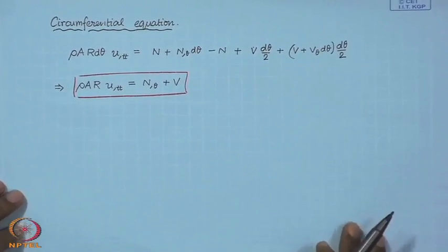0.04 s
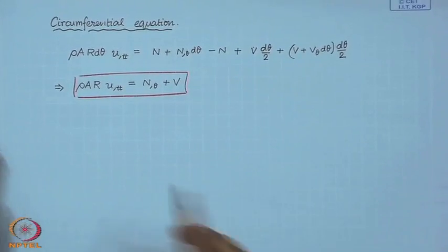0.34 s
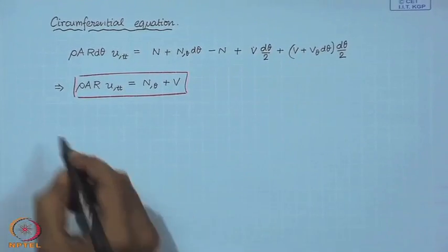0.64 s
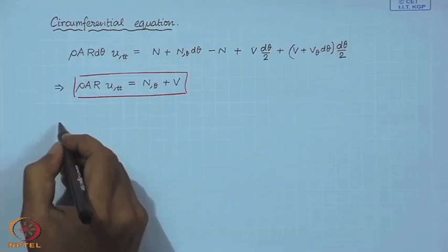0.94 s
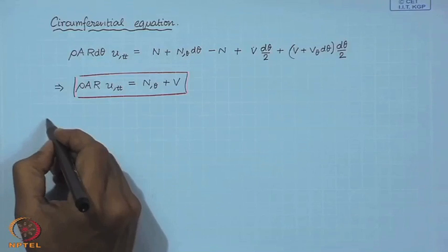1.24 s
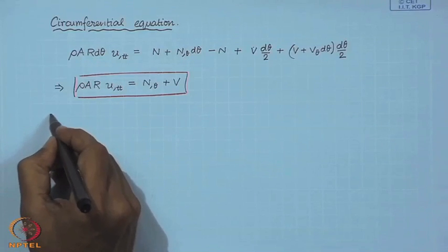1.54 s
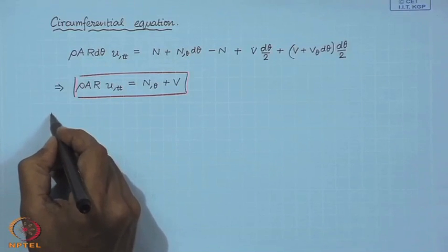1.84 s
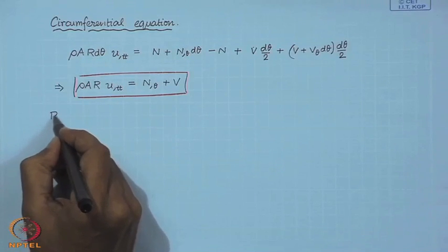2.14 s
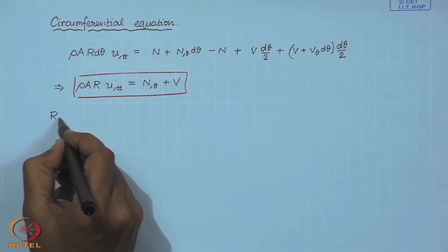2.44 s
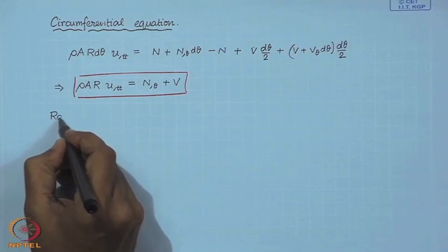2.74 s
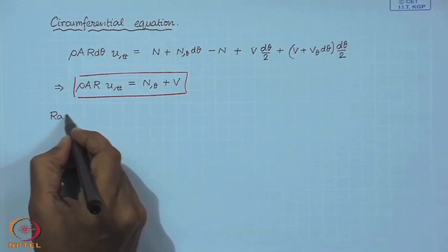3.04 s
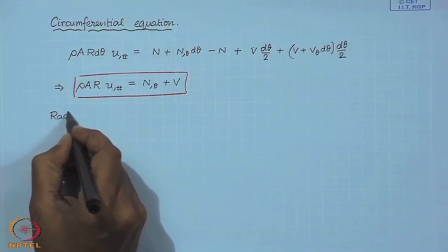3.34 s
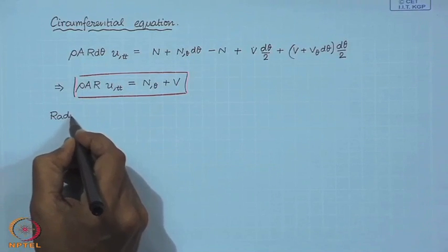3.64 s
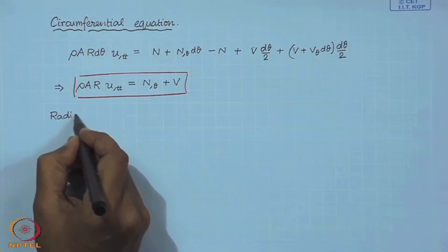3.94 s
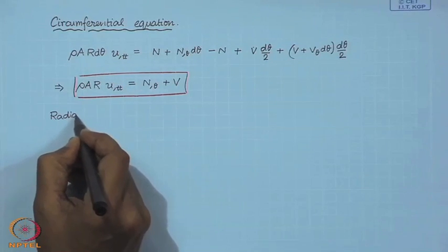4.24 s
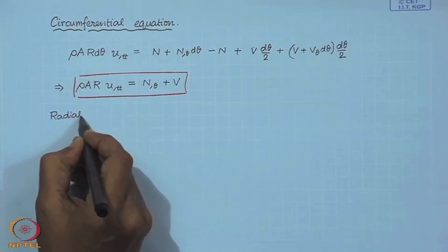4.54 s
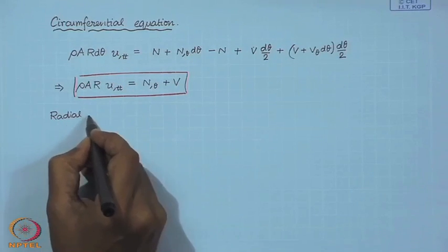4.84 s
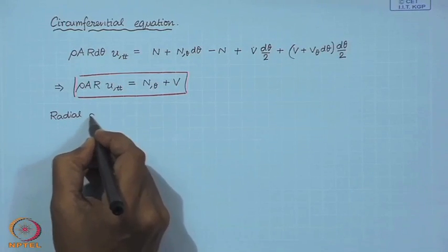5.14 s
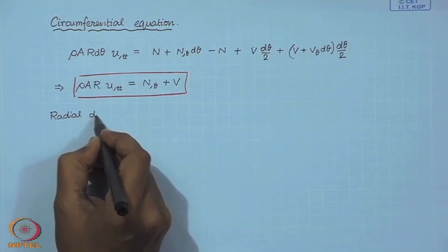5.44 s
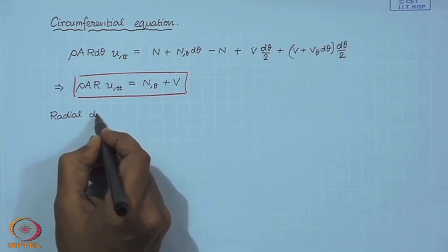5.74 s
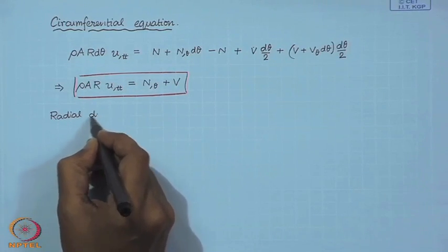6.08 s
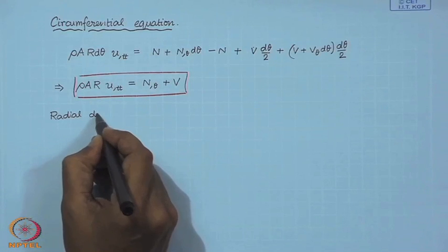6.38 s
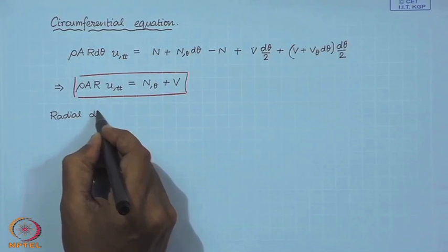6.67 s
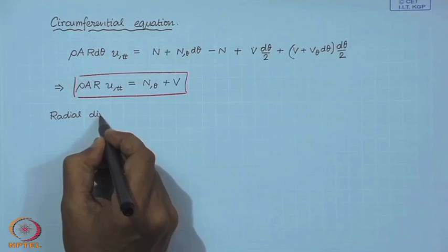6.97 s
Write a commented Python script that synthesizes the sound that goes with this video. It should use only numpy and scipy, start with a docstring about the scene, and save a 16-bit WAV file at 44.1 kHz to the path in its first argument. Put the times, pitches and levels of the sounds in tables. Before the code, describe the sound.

Paper rustles softly under a sliding hand, and a click and a small desk thump follow. A pen then scratches lightly on the sheet in brief clusters of strokes, growing sparser toward the end, among tiny taps and brushes of skin. The writing is faint against the steady low rumble of ventilation in a lecture room, heard through a single microphone.

```python
"""A hand slides across a sheet of paper, over the low rumble of ventilation in a quiet lecture room.
Then a pen writes a few letters: its tip catches and slips on the fibres, and this stick-slip friction
excites the resonances of pen and sheet. Between letters the hand shuffles along, and small impacts
tick on the paper and set the desk ringing. The room adds a short, dull reverberation;
faint thin tones come and go behind it all."""
import sys
import numpy as np
from scipy import signal
from scipy.fft import rfft, irfft, next_fast_len
from scipy.io import wavfile
from scipy.ndimage import uniform_filter1d, map_coordinates

SR = 44100
rng = np.random.default_rng(int(sys.argv[2]) if len(sys.argv) > 2 else 0)


def unload_audio(sound):
    """Save the sound as a 16-bit wav file, at the path given as the first command line argument."""
    columns = np.transpose(np.atleast_2d(sound))
    # keep every value between -1 and 1, then stretch to whole-number steps
    steps = np.round(np.clip(columns, -1, 1) * 32767)
    wavfile.write(sys.argv[1], SR, steps.astype(np.int16))


N = 313551
TIME = np.arange(N) / SR


def pen():
    """Stick-slip friction drives resonances: direction selects the pen's, pressure excites the sheet's."""
    # strokes: start t/s, fastest t/s, end t/s, pen level/dB, sideways drag (0-1), sheet level/dB
    strokes = [(1.653, 1.68, 1.738, -73.9, 0.45, -77.0), (1.981, 2.032, 2.08, -68.7, 0.04, -77.5),
               (2.1, 2.142, 2.185, -70.3, 0.25, -76.0), (2.156, 2.192, 2.228, -82, 0.13, -84.0),
               (2.263, 2.293, 2.398, -80.9, 0.36, -78.0), (2.58, 2.62, 2.695, -76.5, 0.25, -76.0),
               (2.701, 2.763, 2.811, -73.8, 0.27, -79.0), (3.02, 3.1, 3.155, -74, 0.2, -77.5),
               (3.164, 3.216, 3.282, -74.8, 0.15, -81.0), (3.248, 3.284, 3.322, -73.3, 0.5, -79.0),
               (3.352, 3.37, 3.423, -74.8, 0.7, -74.5), (3.452, 3.477, 3.497, -75.1, 0.31, -81.0),
               (3.974, 4.024, 4.068, -71.4, 0.33, -74.5), (4.08, 4.112, 4.178, -72.6, 0.19, -80.0),
               (4.258, 4.292, 4.333, -76.7, 0.18, -79.0), (4.306, 4.342, 4.417, -76.6, 0.48, -80.0),
               (4.453, 4.463, 4.532, -76.1, 0.67, -77.0), (4.498, 4.551, 4.56, -83.0, 0.23, -83.0),
               (5.001, 5.066, 5.106, -78.3, 0.26, -78.0), (5.072, 5.093, 5.138, -75.9, 0.61, -80.0),
               (5.128, 5.184, 5.211, -73.5, 0.22, -77.0), (5.181, 5.235, 5.285, -76, 0.7, -81.0),
               (5.308, 5.332, 5.382, -77.8, 0.84, -77.0), (5.386, 5.429, 5.457, -83.7, 0.38, -83.0),
               (6.89, 6.917, 6.945, -86.5, 0.77, -86), (6.994, 7.046, 7.077, -80.7, 0.73, -82.0),
               (7.055, 7.067, 7.109, -76.7, 0.18, -81.0)]
    # the tip lands on or grazes the sheet: t/s, level/dB
    landings = [(1.758, -83), (1.988, -75), (2.897, -81.5), (2.998, -79), (3.891, -79), (6.54, -80)]
    # modes of the scratching tip: f/Hz, width/Hz, relative level/dB
    tip_modes = [(5080, 450, -13), (7350, 400, -11), (7800, 500, -7), (8300, 450, -8.5), (9300, 420, -7.5),
                 (9780, 400, -6), (10680, 330, -10.5), (11350, 560, -3), (11780, 480, 0),
                 (12150, 480, -4.5), (13280, 480, -8), (13900, 340, -9), (15050, 380, -13),
                 (15600, 400, -12)]
    # modes of the pen dragged sideways: f/Hz, width/Hz, relative level/dB
    barrel_modes = [(2700, 400, -5), (3400, 340, -2.5), (5500, 750, -0.5), (6200, 520, 1), (8200, 380, -4),
                    (9400, 500, -4), (9850, 380, -5.5), (12150, 400, -5.5), (13330, 600, 0.5),
                    (14000, 430, -0.5), (15050, 450, -7), (15600, 350, -8)]
    # modes of the sheet under the tip: f/Hz, width/Hz, relative level/dB
    paper_modes = [(960, 1670, 4.5), (1520, 360, -2), (1950, 240, 1), (2640, 380, 1), (3540, 980, -9)]
    landing_rise_s = 0.0056
    scratch, drag, press = np.zeros((3, N))
    for start, fastest, end, pen_db, sideways, sheet_db in strokes:
        friction = stroke_friction(start, fastest, end)
        along, across = split_power(sideways)
        scratch += amp(pen_db) * along * friction
        drag += amp(pen_db) * across * friction
        press += amp(sheet_db) * friction
    for start, db in landings:
        age = np.maximum(TIME - start, 0) / landing_rise_s
        scratch += amp(db) * age * np.exp(1 - age)
    tip = drifting_modes(fibre_slips(per_second=12000, spread_db=0.5), tip_modes, drift_db=2.5)
    barrel = drifting_modes(fibre_slips(per_second=14000, spread_db=2), barrel_modes, drift_db=1.4)
    paper = resonant(fibre_slips(per_second=14000, spread_db=2), paper_modes)
    grain = amp(1.54 * wobble(130))  # the uneven sheet makes the friction flutter
    return grain * (amp(0.16) * scratch * tip + amp(1.0) * drag * barrel + amp(-0.66) * press * paper)


def stroke_friction(start, fastest, end):
    """Friction noise follows a power law of the tip's speed, which rises to a peak and falls to rest."""
    progress = np.interp(TIME, np.sort([start, fastest, end]), [0, .5, 1])
    speed = np.abs(np.sin(np.pi * progress))
    return np.sqrt(2) * speed ** 1.5


def fibre_slips(per_second, spread_db):
    """Shot noise: tiny slips over paper fibres, random in time and in size."""
    caught = rng.random(N) < per_second / SR
    return caught * rng.standard_normal(N) * amp(spread_db * rng.standard_normal(N))


def drifting_modes(x, modes, drift_db):
    """Modal superposition, at rms 1: each mode's strength drifts as the pen tilts and turns."""
    return unit(sum(amp(db + drift_db * wobble(12)) * filtered(x, lambda f: resonance(f, hz, width))
                    for hz, width, db in modes))


def hand():
    """Sliding friction makes broadband noise: the sheet rustles under the hand and bare skin hisses."""
    # a long sweep and short shuffles: start t/s, end t/s, level/dB, share of bare skin (0-1)
    slides = [(0.065, 1.455, -79, 0.42), (0.01, 0.48, -86.5, 0.66), (.28, 0.32, -76.5, 0.2),
              (0.35, 0.38, -84, 0.3), (0.446, 0.522, -93, 1), (0.847, 1.202, -94, 0.1),
              (1.273, 1.43, -84.5, .05), (2.27, 2.38, -83, 0.1), (3.27, 3.4, -82, .05),
              (3.9, 4.042, -81, 0), (4.59, 4.692, -81.5, 0.93), (4.715, 4.77, -88, .9),
              (5.8, 5.853, -83.5, 1), (5.855, 5.897, -89, 0.6), (5.958, 5.998, -86.5, 0.97),
              (6.27, 6.4, -83, .05), (6.46, 6.51, -86, .16), (6.725, 6.745, -90, 0.7),
              (6.895, 6.94, -89, .1)]
    # spectrum of rubbing skin: f/Hz, relative level/dB
    skin_spectrum = [(1000, -22), (4000, -7.5), (6500, 2.5), (9800, 2), (12000, 0.5), (16000, -12)]
    # spectrum of the rubbed sheet: f/Hz, relative level/dB
    sheet_spectrum = [(200, -1.5), (700, 4), (1600, 6), (3000, 0.5), (5000, -3.5), (9000, -11.5),
                      (13000, -14), (16000, -20)]
    hiss, rustle = np.zeros((2, N))
    for start, end, db, bare in slides:
        rub = amp(db) * swell(start, end, edge_s=0.027)
        on_sheet, on_skin = split_power(bare)
        rustle += on_sheet * rub
        hiss += on_skin * rub
    skin = coloured(fibre_slips(per_second=8400, spread_db=0), skin_spectrum)
    sheet = coloured(fibre_slips(per_second=9000, spread_db=3.5), sheet_spectrum)
    return amp(0.22 * wobble(55)) * (hiss * skin + rustle * sheet)


def taps():
    """Impact excitation: a touch ticks on the paper and pushes the desk into damped free vibration."""
    # touches of pen and fingers: t/s, tick level/dB, tick f/Hz, crunch T60/s, knock level/dB
    touches = [(.023, -56, 8000, .004, -90), (.879, -33, 1800, .006, -70), (.976, -48, 2500, .012, -64),
               (1.1, -41.5, 1000, .01, -51.5), (4.466, -52, 2200, .008, -80), (4.604, -57, 8000, .004, -90),
               (4.613, -53, 8500, .005, -85), (5.8143, -47, 7000, .004, -85), (6.29, -50, 3800, .02, -80),
               (6.323, -53, 4200, .025, -80), (6.667, -51.5, 4000, .025, -85)]
    # modes of the desk: f/Hz, relative level/dB, T60/s
    desk_modes = [(135, -3, .25), (172, -6.5, .22), (255, -4, .09), (320, -10, .04)]
    contact_s, crunch_db = .0007, -6  # rise of the push; fibres crunching after the tick
    out = np.zeros(N)
    for start, tick_db, tick_hz, crunch_t60, knock_db in touches:
        age = np.maximum(TIME - start, 0)
        band = signal.butter(2, [tick_hz * .45, tick_hz * 1.9], "bandpass", fs=SR)
        crunch = (age > 0) * amp(-60 * age / crunch_t60) * rng.standard_normal(N)
        snap = signal.unit_impulse(N, round(start * SR)) + amp(crunch_db) * crunch / np.linalg.norm(crunch)
        out += amp(tick_db) * signal.lfilter(*band, snap)
        push = (age / contact_s) ** 2 * np.exp(1 - (age / contact_s) ** 2)
        thud = sum(amp(db - 60 * age / t60) * np.sin(2 * np.pi * hz * age) for hz, db, t60 in desk_modes)
        out += amp(knock_db) * (push + thud)
    return out


def room(x):
    """Reverberation: diffuse, dull reflections follow the direct sound and decay exponentially."""
    echo_db, t60_s, gap_s, dull_hz = -8.5, .35, .004, 4500
    t = np.arange(SR // 2) / SR
    tail = rng.standard_normal(len(t)) * amp(-60 * t / t60_s) * (t > gap_s)
    echo = signal.fftconvolve(x, tail / np.linalg.norm(tail))[:N]
    return x + amp(echo_db) * filtered(echo, lambda f: 1 / np.sqrt(1 + (f / dull_hz) ** 2))


def thin_tones():
    """Narrow-band noise is heard as faint, fuzzy tones that swell and fade."""
    # tones: start t/s, end t/s, f/Hz, width/Hz, level/dB
    tones = [(1.305, 1.365, 1680, 420, -80), (1.36, 1.64, 1660, 170, -85), (1.83, 1.92, 1390, 180, -80.5),
             (1.94, 2.05, 1390, 130, -83), (2.11, 2.18, 1930, 160, -82), (3.04, 3.15, 1580, 110, -83),
             (5.872, 5.882, 2500, 150, -87)]
    return sum(amp(db) * swell(start, end, edge_s=0.029)
               * resonant(rng.standard_normal(N), [(hz, width, 0)]) for start, end, hz, width, db in tones)


def ventilation():
    """Forced resonance: moving air throbs in the ducts and drones in the room, over hiss and hum."""
    # modes of the ducts: f/Hz, width/Hz, relative level/dB
    duct_modes = [(17.08, 1.8, -7), (27.72, 2.75, 0.5), (36.24, 8.3, -6.5), (43, 1, -19)]
    # slow swell of the throb: t/s, level/dB
    throb_levels = [(0, -38), (.3, -33.5), (.45, -39.5), (1.35, -37), (1.95, -45), (2.85, -32), (3.15, -41),
                    (4.5, -35.5), (4.95, -44.5), (5.75, -36.5), (6.1, -43), (7.1, -37)]
    # modes of the room: f/Hz, width/Hz, relative level/dB
    room_modes = [(56.1, 7, -0.5), (60.9, 8, -3), (70.4, 12, -13), (84.4, 17, -20.5), (163.4, 24, -29),
                  (199.4, 24, -30), (244.2, 14, -33), (436, 94, -38.5), (681, 39, -43), (1055, 150, -49.5),
                  (1570, 130, -55)]
    # spectrum of the steady air noise: f/Hz, relative level/dB
    air_spectrum = [(20, 5), (70, -3), (100, 1.5), (140, -10), (270, -10), (340, -15.5), (500, -16.5),
                    (750, -21), (1100, -25.5), (1800, -29.5), (2700, -37.5), (3200, -39.5), (5000, -43),
                    (11000, -45.5), (15500, -48)]
    # hum of mains and fans: f/Hz, rms level/dB
    hum_partials = [(100, -74.5), (120, -74), (200, -80.5), (246, -79.5), (409, -85), (463, -83),
                    (909.8, -88.5)]
    # faint narrow whines: f/Hz, width/Hz, relative level/dB
    whine_bands = [(2856, 40, 0), (3907, 110, -3.5), (10770, 170, -6), (11240, 170, -5.5)]
    flow = resonant(rng.standard_normal(N), duct_modes)
    running_rms = np.sqrt(np.abs(uniform_filter1d(flow ** 2, size=SR // 4)) + 1e-4)
    throb = amp(np.interp(TIME, *np.transpose(throb_levels))) * flow / running_rms
    rumble = filtered(throb, lambda f: 1 / np.sqrt(1 + (f / 60) ** 10))  # ducts pass only the deepest part
    drone = amp(-48.5) * resonant(rng.standard_normal(N), room_modes)
    air = amp(-58.5) * coloured(rng.standard_normal(N), air_spectrum)
    hum = sum(amp(db) * np.sqrt(2) * np.sin(2 * np.pi * hz * TIME + 0.71 * wobble(3))
              for hz, db in hum_partials)
    whine = amp(-94) * resonant(rng.standard_normal(N), whine_bands)
    return rumble + drone + air + hum + whine


def resonance(f, hz, width):
    """Steep-sided resonance: the gain at f of two equal damped resonators in cascade."""
    return np.abs(f * width / (hz * hz - f * f + 1j * f * width)) ** 2


def resonant(x, modes):
    """Resonant filtering of x by modes that add in power, at rms 1."""
    power = lambda f: sum((amp(db) * resonance(f, hz, width)) ** 2 for hz, width, db in modes)
    return unit(filtered(x, lambda f: np.sqrt(power(f))))


def coloured(x, spectrum):
    """Spectral shaping of x by (f/Hz, level/dB) points on a log frequency axis, at rms 1."""
    hz, db = np.transpose(spectrum)
    return unit(filtered(x, lambda f: amp(np.interp(np.log(f + 1), np.log(hz), db))))


def filtered(x, response):
    """Linear filtering: the spectrum of x is multiplied by a frequency response."""
    size = next_fast_len(N + SR)
    return irfft(rfft(x, size) * response(np.fft.rfftfreq(size, 1 / SR)), size)[:N]


def swell(start, end, edge_s):
    """Half-sine envelope, widened by edge_s at both ends."""
    progress = np.clip((TIME - start + edge_s) / max(end - start + 2 * edge_s, .005), 0, 1)
    return np.sqrt(2) * np.sin(np.pi * progress)


def split_power(share):
    """Conservation of power: two gains whose squares sum to 1; the second is share."""
    share = np.clip(share, 0, 1)
    return np.sqrt(1 - share ** 2), share


def wobble(rate):
    """Random modulation: a smooth curve through rate knots a second."""
    return map_coordinates(rng.standard_normal(int(N * rate / SR) + 4), [TIME * rate])


def amp(db):
    """Level in decibels to amplitude ratio."""
    return 10 ** (np.asarray(db) / 20)


def unit(x):
    """Normalisation to rms 1."""
    return x / np.sqrt(np.mean(x ** 2) + 1e-20)


def scene():
    """Superposition at one microphone: the writing, its reverberation and the background."""
    return (room(pen() + hand() + taps()) + thin_tones() + ventilation())[None]


def record(dry):
    """Band limiting: the sound fades briefly at both ends and loses its highest treble."""
    fade_s, top_hz = .002, 15740
    fade = np.clip(np.minimum(TIME, TIME[-1] - TIME) / fade_s, 0, 1)
    return filtered(dry[0] * fade, lambda f: f < top_hz)[None]


dry = scene()
out = record(dry)
unload_audio(out)
```